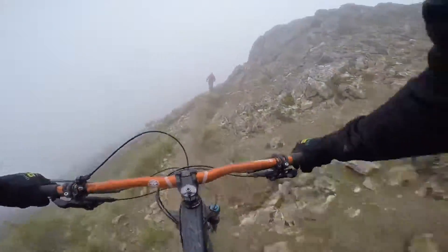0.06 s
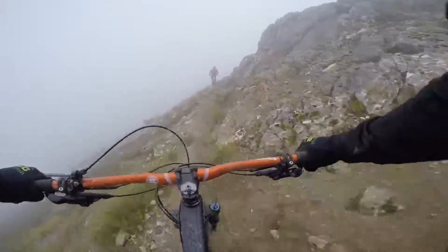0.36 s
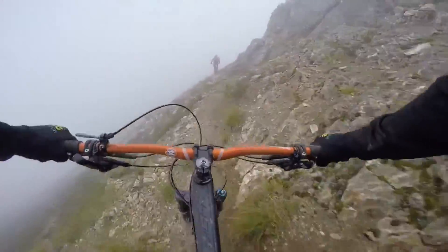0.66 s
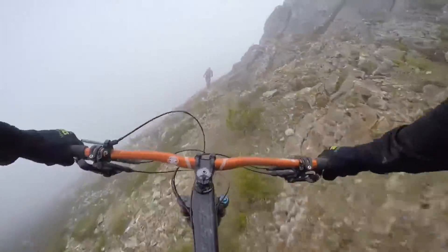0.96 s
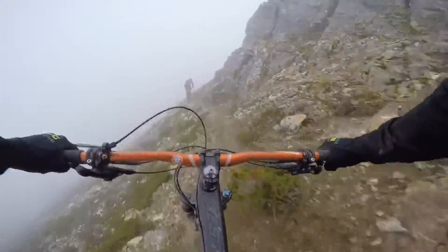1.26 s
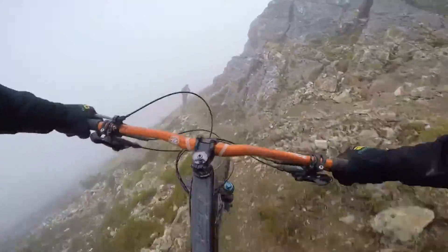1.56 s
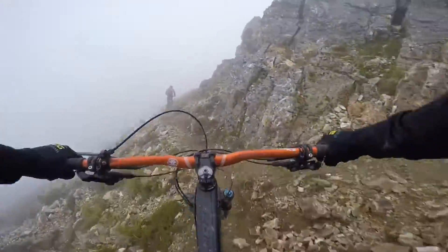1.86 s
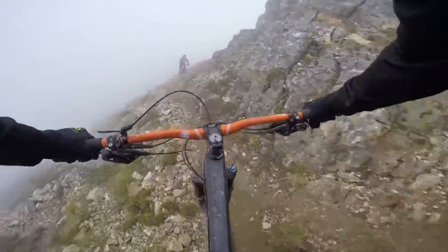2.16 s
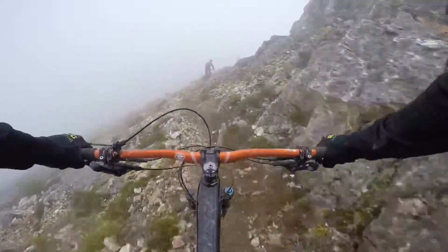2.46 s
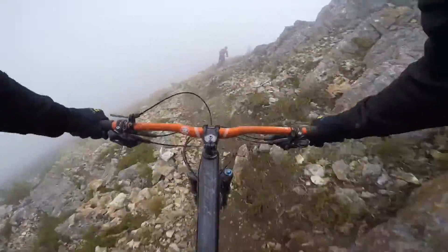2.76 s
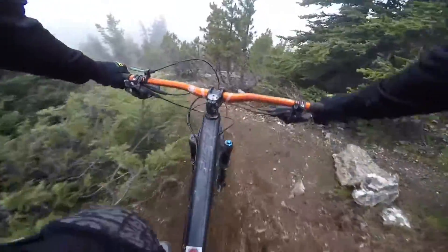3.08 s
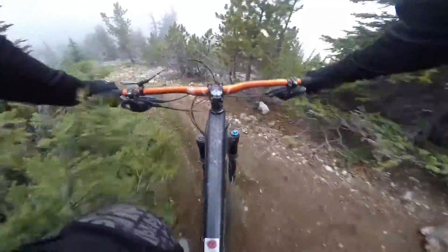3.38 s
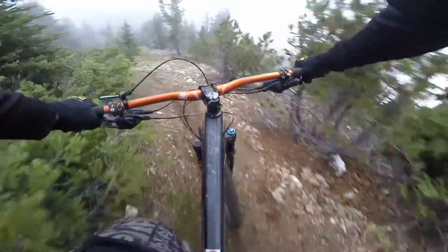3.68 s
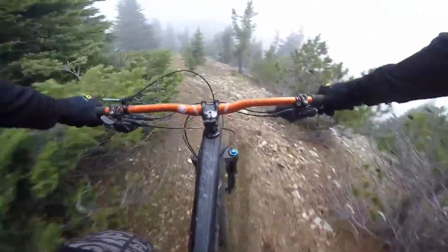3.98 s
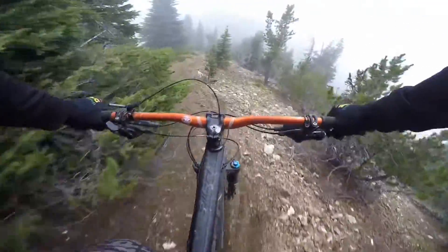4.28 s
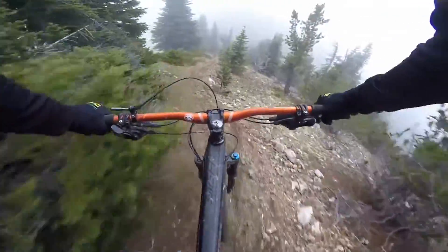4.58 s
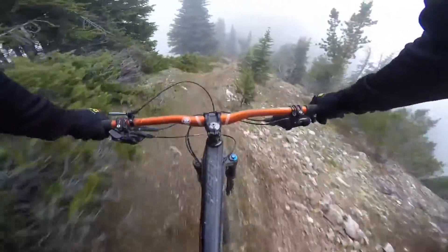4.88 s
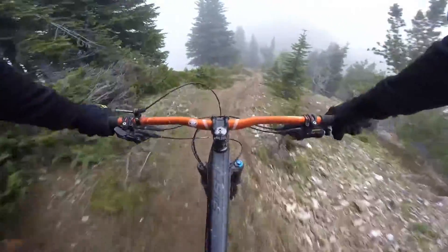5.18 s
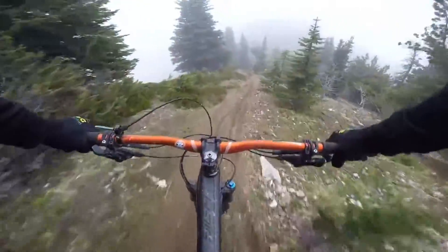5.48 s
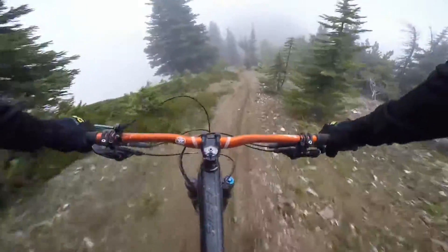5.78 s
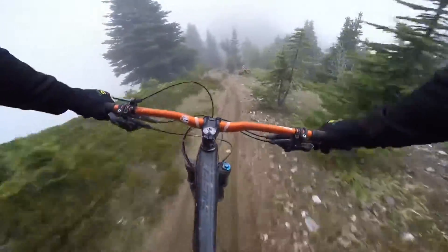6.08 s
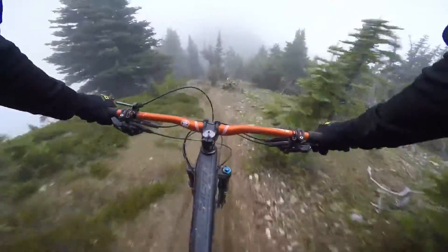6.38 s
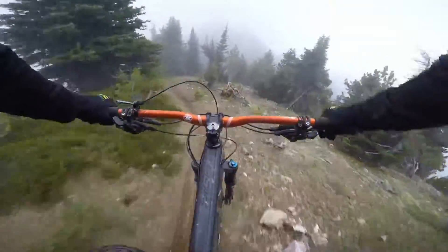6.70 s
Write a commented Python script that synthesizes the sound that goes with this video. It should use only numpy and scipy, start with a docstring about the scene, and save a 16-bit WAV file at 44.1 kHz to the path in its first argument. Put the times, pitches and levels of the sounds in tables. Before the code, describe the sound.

A mountain bike rides down a loose, rocky trail, heard close from the rider's chest in open air. Wind rumbles and gusts on the microphone while tyres crunch over gravel, stones clack and the chain slaps. Midway the wind eases and the tyres roar louder, with hard knocks and a hollow ring from the wheels. After a quieter stretch with light metal jingles, the wind surges back along with heavy thuds from the frame.

```python
"""A loose, rocky mountain trail, heard from the chest of a rider taking a bike down it.
Wind eddies buffet the microphone and tear into a rush at speed. Over the bumps metal parts jingle,
the chain slaps, the fork clanks and the frame knocks. Stones scrape, clack and crunch under the tread;
the knobby tyres roar on dirt, louder under load, and hard compressions leave the wheels ringing.
A sharp click sounds at 2.81 s."""
import sys
import numpy as np
from scipy import signal
from scipy.fft import rfft, irfft
from scipy.io import wavfile
from scipy.ndimage import uniform_filter1d

SR = 44100
rng = np.random.default_rng(int(sys.argv[2]) if len(sys.argv) > 2 else 0)


def dump(signal):
    """Clip the signal to [-1, 1] and save it as 16-bit WAV at the path in sys.argv[1]."""
    limited = np.clip(np.atleast_2d(signal).T, -1, 1)
    pcm = np.round(limited * 32767).astype(np.int16)
    wavfile.write(sys.argv[1], SR, pcm)


N = 301644
TIME_S = np.arange(N) / SR


def amp(db):
    """Decibels to gain."""
    return 10 ** (np.asarray(db) / 20)


def unit(x):
    """Scale to rms 1."""
    return x / np.sqrt(np.mean(x ** 2) + 1e-20)


def peaked(x, db):
    """Scale to a peak level."""
    return x * amp(db) / abs(x).max()


def steady(x, span_s):
    """Hold the running rms at 1; texture finer than span_s stays."""
    power = uniform_filter1d(x ** 2, max(int(span_s * SR), 3))
    return x / np.sqrt(np.maximum(power, 1e-12))


def curve(rows):
    """Interpolate (time, value) rows at every sample."""
    return np.interp(TIME_S, *np.transpose(rows))


def swell(start_s, rise_s, hold_s, release_s):
    """Envelope: linear rise, hold at 1, exponential release."""
    t = TIME_S - start_s
    return np.clip(t / rise_s, 0, 1) * np.exp(-np.maximum(t - rise_s - hold_s, 0) / release_s)


def surges(rows, rise_s, release_s):
    """Gain of a series of swells, summed in power."""
    return np.sqrt(sum((amp(db) * swell(t, rise_s, hold_s, release_s)) ** 2 for t, hold_s, db in rows))


def add(mix, start_s, sound):
    """Mix a sound in at start_s."""
    part = mix[max(round(start_s * SR), 0):][:len(sound)]
    part += sound[:len(part)]


def lowpass(x, hz, order=2):
    """Butterworth low-pass."""
    return signal.sosfilt(signal.butter(order, hz, fs=SR, output="sos"), x)


def colour(x, spectrum, size=16384):
    """Minimum-phase filter through (frequency, level) points."""
    hz, db = np.transpose(spectrum)
    bins_hz = abs(np.fft.fftfreq(size, 1 / SR))
    log_gain = np.log(amp(np.interp(np.log(bins_hz + 1), np.log(hz), db)))
    response = np.exp(np.conj(signal.hilbert(log_gain)))
    taps = np.fft.ifft(response).real[:size // 2]
    return signal.oaconvolve(x, taps * np.hanning(size)[size // 2:])[:len(x)]


def resonate(x, hz, width_hz):
    """Two-pole resonance, peak gain 1."""
    return signal.lfilter(*signal.iirpeak(hz, hz / width_hz, SR), x)


def ring(force, modes):
    """Drive a body's modes; neighbours swing in opposite senses."""
    return sum(amp(db) * resonate(force, hz, width_hz) * (-1) ** k
               for k, (hz, width_hz, db) in enumerate(modes))


def wander(hz):
    """Random drift of rms 1, rolling off above hz."""
    rolloff = 1 / (1 + (np.fft.rfftfreq(N, 1 / SR) / hz) ** 4)
    return unit(irfft(rfft(rng.standard_normal(N)) * rolloff, N))


def grains(per_s, spread_db):
    """Random clicks; a positive spread makes a few larger, a negative one a few smaller."""
    size = amp(spread_db * np.minimum(rng.exponential(1, N), 4))
    return size * rng.choice([-1, 1], N) * (rng.random(N) < per_s / SR)


def strike(t60_s, chatter, size=8000):
    """One impulse, then dying chatter."""
    force = chatter * rng.standard_normal(size) * amp(-60 * np.arange(size) / SR / t60_s)
    force[0] = 1
    return force


def blow(air, gain, edge_hz, brighten):
    """Moving air loses its part above edge_hz as it slackens."""
    body = signal.filtfilt(*signal.butter(1, edge_hz, fs=SR), air, padtype=None)
    return gain * (body + (air - body) * (gain / gain.max()) ** brighten)


# Spectra of large and small eddies: f/Hz, level/dB
EDDY_SPECTRUM = [(8, -18.5), (18, -4.5), (28, 3.5), (48, 2.5), (85, -4), (130, -10.5), (250, -24.5),
                 (1000, -100)]
SWIRL_SPECTRUM = [(40, -21), (80, 5), (130, 0.5), (250, -3), (480, -8), (750, -19), (1100, -37),
                  (6000, -87.5)]
# Strength of the slow eddies: t/s, level/dB
EDDY_LEVELS = [(0, -13.5), (1.45, -13.5), (1.66, -18), (2.25, -14), (2.75, -14), (3.2, -21), (3.95, -21.5),
               (4.65, -28), (5.8, -19), (6.25, -12), (6.84, -14.5)]
# Turbulence between gusts, low in the shelter of trees: t/s, level/dB
TURBULENCE_LEVELS = [(0, -24), (1.5, -26), (2.1, -19.5), (2.75, -28.5), (3.3, -36), (4.6, -45.5),
                     (6.1, -32), (6.3, -24), (6.84, -19.5)]
# Fast gusts and slow puffs: t/s, hold/s, level/dB
AIR_GUSTS = [(0.046, 0.18, -22), (0.642, 0.046, -19.5), (1.042, 0.14, -23.5), (2.032, 0.14, -18),
             (2.493, 0.013, -22), (6.23, 0.15, -14.5), (6.514, 0.025, -17), (6.6, 0.095, -16)]
AIR_PUFFS = [(1.3, 0.13, -16), (2.15, 0.166, -15), (2.74, 0.012, -17.5), (2.89, 0.038, -15),
             (3.41, 0.18, -21.5), (4.7, 0.048, -25.5), (5.132, 0.14, -21), (5.467, 0.092, -22)]


def wind(buffet_db=1.0, burst_db=2.5):
    """Large eddies rumble on the microphone, small ones rush in rapid bursts, puffs push deep and slow."""
    eddies = steady(colour(rng.standard_normal(N), EDDY_SPECTRUM), span_s=0.081)
    bursts = rng.standard_normal(N) * amp(burst_db * wander(hz=58))
    swirl = steady(colour(bursts, SWIRL_SPECTRUM), span_s=0.06)
    buffeting = amp(curve(EDDY_LEVELS) + buffet_db * wander(hz=6))
    rumble = blow(eddies, buffeting, edge_hz=57, brighten=0.95)
    gusts = surges(AIR_GUSTS, rise_s=0.039, release_s=0.064)
    airflow = np.hypot(amp(curve(TURBULENCE_LEVELS)), gusts)
    rush = blow(swirl, airflow, edge_hz=520, brighten=1)
    push = lowpass(colour(rng.standard_normal(N), EDDY_SPECTRUM), hz=50, order=3)
    puffs = steady(push, span_s=0.13) * surges(AIR_PUFFS, rise_s=0.056, release_s=0.022)
    return rumble * amp(-1) + rush * amp(1.5) + puffs


# Jingles of small metal parts: t/s, level/dB, t60/s
METAL_JINGLES = [(1.398, -38, 0.28), (4.936, -32, 0.22), (5.022, -35.5, .25), (6.2556, -28, 0.022),
                 (6.301, -30.5, 0.036), (6.3445, -31, 0.027), (6.394, -32, .03)]


def jingles(pitch_hz=2780, width_hz=750):
    """A loose metal part buzzes against its seat in a short train of contacts."""
    out = np.zeros(N)
    for t, db, t60_s in METAL_JINGLES:
        buzz = resonate(strike(t60_s, chatter=0.77), pitch_hz, width_hz)
        add(out, t, peaked(resonate(buzz, pitch_hz, width_hz), db))
    return out


# Bright slaps, and a sharp click at 2.81 s: t/s, level/dB, t60/s
BRIGHT_SLAPS = [(1.191, -34, .06), (1.485, -27.5, 0.045), (1.586, -37, 0.52), (1.9366, -13, 0.033),
                (2.808, -21.5, 0.005), (2.942, -30, .02), (3.062, -36.5, 0.15), (3.131, -25, 0.025),
                (3.505, -17, 0.13), (3.852, -28, 0.069), (4.086, -29, 0.024), (4.581, -28, 0.026),
                (5.121, -29, 0.032), (5.699, -24, 0.1), (6.25, -32, .04), (6.491, -31, 0.052)]
# Slap spectrum: f/Hz, level/dB
SLAP_SPECTRUM = [(1000, -5), (3800, -2), (5400, 6), (7000, -3.5), (8800, -1), (10500, -7.5), (12200, -2.5),
                 (15500, -8)]


def slaps():
    """Brief bright sprays; all but the click at 2.81 s are chain or grit hitting the frame."""
    out = np.zeros(N)
    for t, db, t60_s in BRIGHT_SLAPS:
        add(out, t, peaked(colour(strike(t60_s, chatter=0.19), SLAP_SPECTRUM), db))
    return out


# Jolts to the fork: t/s, level/dB, centre f/Hz
FORK_JOLTS = [(1.333, -27, 2700), (3.794, -21, 1050), (5.127, -30, 1000), (5.634, -19.5, 1880),
              (5.689, -22.5, 950), (6.561, -20.5, 1140)]
# Modes of fork and bars: f/Hz, width/Hz, level/dB
FORK_BAR_MODES = [(980, 130, 8.5), (1330, 130, 1.5), (2400, 140, 3)]


def fork_clanks(play_s=0.011, play_db=-13):
    """A jolt takes up the play with a light tap, then rings fork and bars, most near its centre."""
    out = np.zeros(N)
    for t, db, hz in FORK_JOLTS:
        for contact_s, contact_db in ((t - play_s, db + play_db), (t, db)):
            force = resonate(strike(t60_s=0.024, chatter=0.2), hz, width_hz=900)
            add(out, contact_s, peaked(ring(force, FORK_BAR_MODES), contact_db))
    return out


# Rock blows: t/s, level/dB, cutoff f/Hz
ROCK_BLOWS = [(0.443, -14.5, 280), (1.451, -19.5, 600), (2.669, -19, 1100), (3.313, -26, 805),
              (3.328, -12, 328), (3.519, -12.5, 450), (3.793, -12.5, 1100), (3.955, -12.5, 566),
              (5.33, -25.5, 600), (5.634, -18, 302), (6.289, -11, 450), (6.561, -10, 700), (6.66, -6, 440),
              (6.693, -7.5, 590)]
# Modes of wheel and frame: f/Hz, width/Hz, level/dB
WHEEL_FRAME_MODES = [(214, 11, 5), (466, 140, 8), (740, 300, 5), (1170, 1160, -7.5)]


def frame_knocks(knock_db=1, scuff_db=-12, scuff_lead_s=0.011):
    """The tread scuffs a rock, then hits it: soft blows thud, hard ones reach the frame's upper modes."""
    out = np.zeros(N)
    for t, db, cutoff_hz in ROCK_BLOWS:
        force = lowpass(strike(t60_s=0.027, chatter=0.13), cutoff_hz)
        thump = lowpass(ring(force, WHEEL_FRAME_MODES), hz=3000, order=4)
        add(out, t, peaked(thump, db + knock_db))
        scuff = lowpass(strike(t60_s=0.051, chatter=0.83), cutoff_hz)
        add(out, t - scuff_lead_s, peaked(ring(scuff, WHEEL_FRAME_MODES), db + scuff_db))
    return out


# Pitched clacks, and a sharp click at 2.81 s: t/s, level/dB, f/Hz
PITCHED_CLACKS = [(0.0777, -22, 3400), (0.695, -29.5, 3630), (0.7995, -28.5, 3330), (0.895, -25.5, 4410),
                  (1.376, -26, 4600), (1.484, -25, 4450), (1.6544, -28, 2010), (1.7812, -23, 4260),
                  (2.5702, -27, 3290), (2.6548, -15, 3470), (2.674, -12, 1410), (2.755, -15.5, 4700),
                  (2.8065, -16, 1330), (2.968, -15, 2700), (3.2268, -23.5, 2280), (3.514, -23, 3500),
                  (3.793, -17.5, 1350), (4.18, -21.5, 4790), (4.709, -24.5, 2070), (5.047, -21.5, 2760),
                  (5.165, -28.5, 2570), (5.3138, -25, 1680), (5.4002, -20.5, 4430), (6.0, -19.5, 1660)]
# Clack and scrape spectrum: f/Hz, level/dB
CLACK_SPECTRUM = [(300, -3), (900, 4.5), (3400, 2.5), (3850, -3), (4500, 3.5), (5400, -7.5), (6800, -15.5),
                  (14000, -37)]


def clacks():
    """Ticks with a brief ring; all but the click at 2.81 s are stones or bike parts striking."""
    out = np.zeros(N)
    for t, db, hz in PITCHED_CLACKS:
        force = strike(t60_s=0.027, chatter=0.11)
        clack = colour(0.5 * force + resonate(force, hz, width_hz=1200), CLACK_SPECTRUM)
        add(out, t, peaked(clack, db))
    return out


# Stones dragged under the tread: t/s, level/dB
STONE_SCRAPES = [(2.665, -26), (3.322, -19.5), (3.503, -20.5), (3.78, -25), (5.687, -23.5)]


def stone_scrapes():
    """A dragged stone rasps in a short run of contacts."""
    out = np.zeros(N)
    for t, db in STONE_SCRAPES:
        add(out, t, peaked(colour(strike(t60_s=0.09, chatter=1), CLACK_SPECTRUM), db))
    return out


# Hard compressions: t/s, hold/s, level/dB
COMPRESSIONS = [(3.31, 0.044, -23), (3.5, 0.053, -21), (3.66, 0.34, -30.5)]
# Modes of the loaded wheels: f/Hz, width/Hz, level/dB
HOLLOW_MODES = [(314, 7.2, 1.5), (438, 21, 1), (480, 31, 0.5)]


def wheel_booms():
    """Pressed hard into the dirt, the wheels keep ringing with a hollow note."""
    hollow = lowpass(ring(rng.standard_normal(N), HOLLOW_MODES), hz=800)
    return steady(hollow, span_s=0.049) * surges(COMPRESSIONS, rise_s=0.026, release_s=0.062)


# Bumps and landings: t/s, added level/dB, release/s
TRAIL_BUMPS = [(1.029, 6.5, 0.12), (1.698, 11.5, 0.029), (2.04, 7, 0.054), (2.636, 15, 0.022),
               (3.292, 14, 0.15), (3.485, 3.5, 0.042), (3.76, 2.5, 0.086), (4.15, 2, 1), (1.47, 8.5, 0.034),
               (6.226, 8, 0.086), (6.529, 7, 0.081)]


def bump_load_db(rise_s=0.014):
    """Extra tyre noise: a bump loads the tyres fast, the suspension lets go slowly."""
    return sum(db * swell(t, rise_s, 0, release_s) for t, db, release_s in TRAIL_BUMPS)


def pebbles(hz, skitter_s=0.022):
    """Stones of one size tick and skitter at their common pitch."""
    hits = grains(per_s=7, spread_db=1.5)
    energy = signal.lfilter([1], [1, -np.exp(-2 / (skitter_s * SR))], hits ** 2)
    skitter = np.sqrt(energy) * rng.standard_normal(N)
    return resonate(unit(hits) + unit(skitter), hz, width_hz=1100)


# Crunch, set by the looseness of the ground: t/s, level/dB
GRAVEL_LEVELS = [(0, -44), (1.45, -43), (1.85, -48), (2.5, -43), (2.9, -39), (3.25, -45.5), (3.6, -36.5),
                 (4.2, -41.5), (4.45, -45.5), (5.0, -44), (6.15, -45), (6.4, -40), (6.84, -45.5)]
# Spectra of gravel and fine grit: f/Hz, level/dB
CRUNCH_SPECTRUM = [(150, -24.5), (450, 19), (850, 6), (1200, 2.5), (3050, -0.5), (3500, 6.5), (3850, -4),
                   (4400, 3.5), (5100, -0.5), (5900, -5), (7000, -14.5), (9500, -50), (15000, -40.5)]
GRIT_SPECTRUM = [(3000, -5.5), (7000, -2), (8500, 5.5), (10500, -1.5), (12700, 1.5), (15000, -9.5)]


def gravel(crunch_db=-2, grit_db=-22, pebble_db=-1, clump_db=1.5):
    """Small stones grind in clumps under the tyres; pebbles tick among them and fine grit hisses."""
    gain = amp(curve(GRAVEL_LEVELS) + bump_load_db())
    relative_gain = gain / gain.mean()
    loose = relative_gain ** -0.07  # a loaded tyre pins the pebbles
    ticks = unit(sum(pebbles(hz) for hz in np.geomspace(1200, 5400, num=12)))
    grind = unit(grains(per_s=9000, spread_db=-2)) * amp(clump_db * wander(hz=29.3))
    crunch = steady(colour(grind + amp(pebble_db) * loose * ticks, CRUNCH_SPECTRUM), span_s=0.3)
    specks = 0.58 * loose * unit(grains(per_s=340, spread_db=4.5))
    grit = steady(colour(grind + specks, GRIT_SPECTRUM), span_s=0.2)
    grit_gain = gain.mean() * relative_gain ** 0.88  # grit lingers where stones thin out
    return crunch * amp(crunch_db) * gain + grit * amp(grit_db) * grit_gain


# Unloaded roar on packed dirt: t/s, level/dB
ROAR_LEVELS = [(0, -41.5), (2.5, -39), (2.9, -28), (3.25, -33.5), (3.55, -24.5), (4.28, -29.5),
               (4.45, -37.5), (6.15, -38), (6.84, -27.5)]
# Modes of the tyre casing: f/Hz, width/Hz, level/dB
CASING_MODES = [(183, 6.2, -3), (298.4, 40, 1.5), (437.4, 60, 3), (495, 82.5, 1.5), (646, 83, -2),
                (836, 112, -6), (1560, 1700, -21)]


def tyre_roar(roar_db=-4, lump_db=2, thud_db=-2, thud_hz=105):
    """Knobs drum on uneven ground and ring the casing; under heavy load it also thuds."""
    drumming = unit(grains(per_s=2100, spread_db=4)) * amp(lump_db * wander(hz=38.6))
    load = amp(curve(ROAR_LEVELS) + bump_load_db())
    casing = steady(lowpass(ring(drumming, CASING_MODES), hz=1300), span_s=0.075)
    low_mode = resonate(drumming, thud_hz, width_hz=thud_hz)
    thud = steady(lowpass(low_mode, 2 * thud_hz), span_s=0.029)
    return load * (casing * amp(roar_db) + thud * amp(thud_db) * load / load.max())


def scene():
    """Open air, mono: direct sound only."""
    rolling = wind() + tyre_roar() + wheel_booms() + gravel()
    hits = clacks() + stone_scrapes() + jingles() + frame_knocks() + fork_clanks() + slaps()
    return (rolling + hits)[None]


def record(dry):
    """Soft-clip the largest thumps, then limit the band."""
    ceiling, edge_hz = 0.95, 15450
    rounded = dry / (1 + (dry / ceiling) ** 8) ** (1 / 8)
    taps = signal.firwin(511, edge_hz, window=("kaiser", 9), fs=SR)
    return signal.oaconvolve(rounded, taps[None], "same")


dry = scene()
out = record(dry)
dump(out)
```